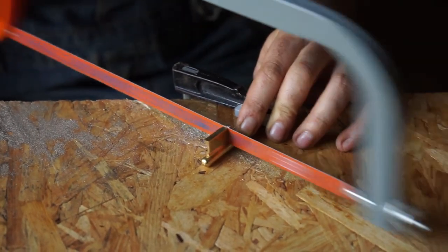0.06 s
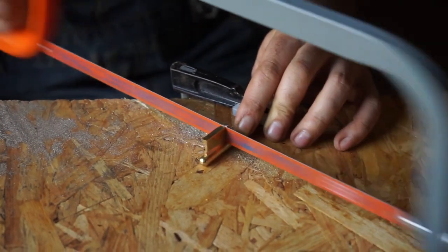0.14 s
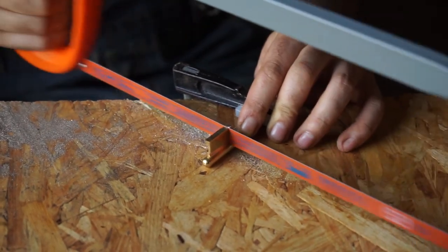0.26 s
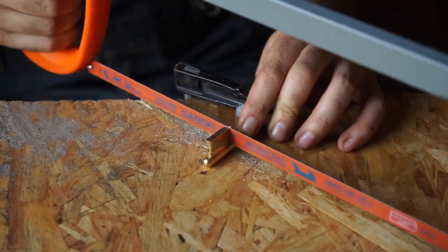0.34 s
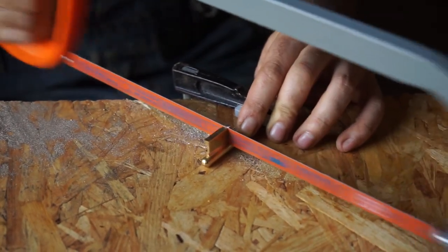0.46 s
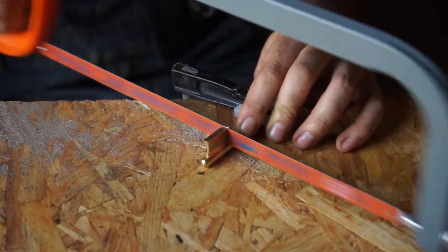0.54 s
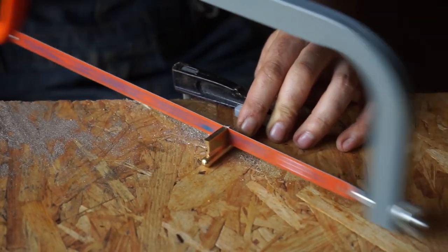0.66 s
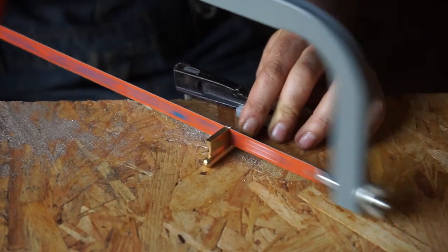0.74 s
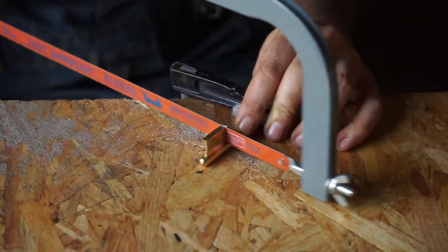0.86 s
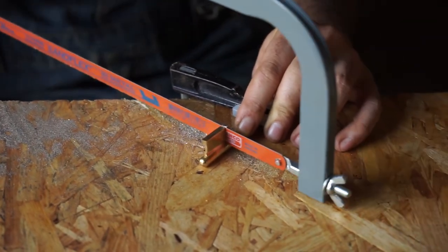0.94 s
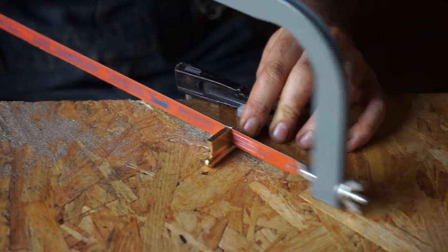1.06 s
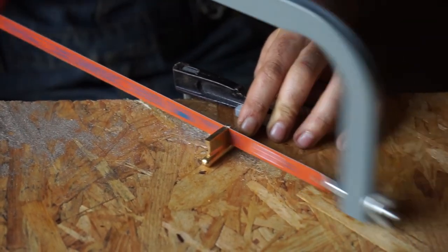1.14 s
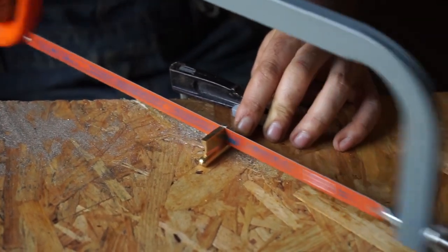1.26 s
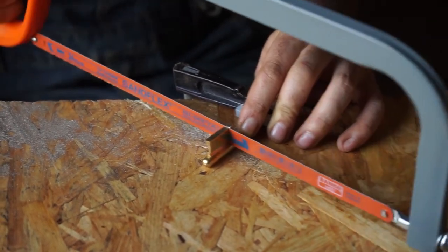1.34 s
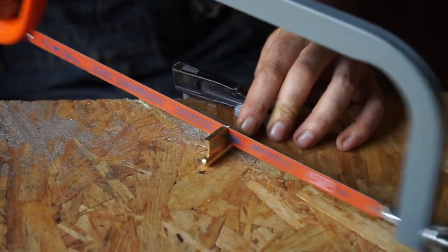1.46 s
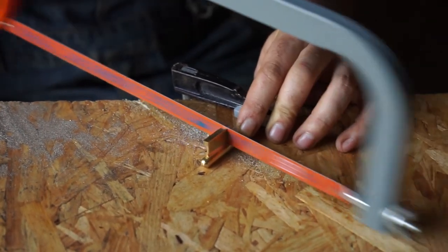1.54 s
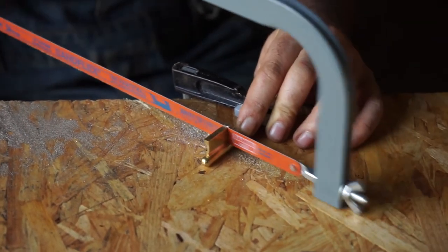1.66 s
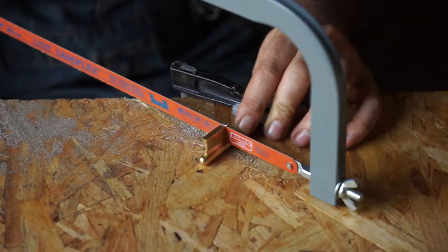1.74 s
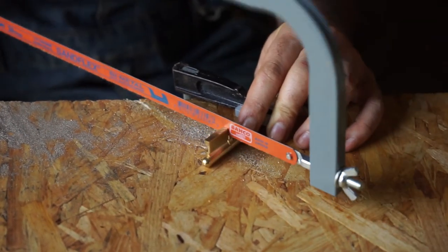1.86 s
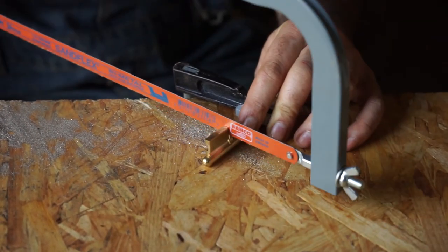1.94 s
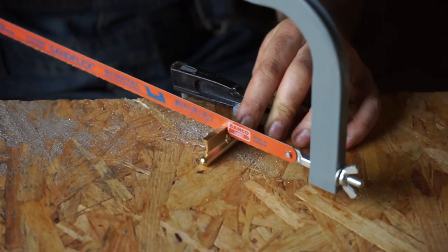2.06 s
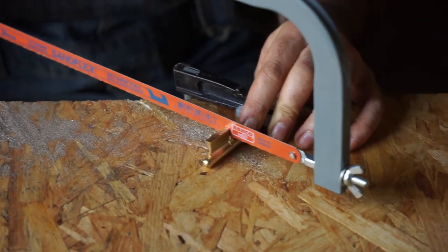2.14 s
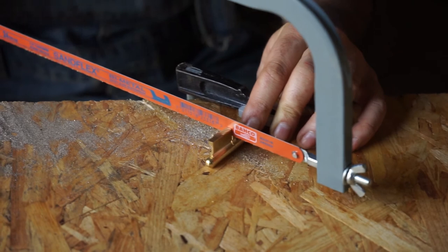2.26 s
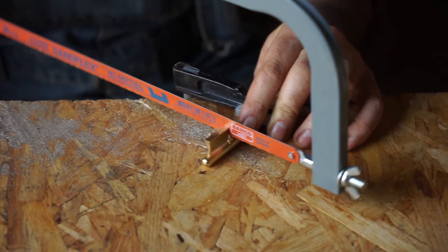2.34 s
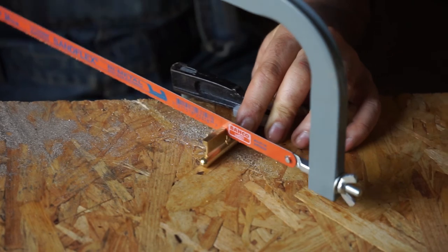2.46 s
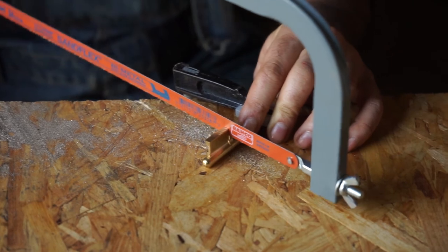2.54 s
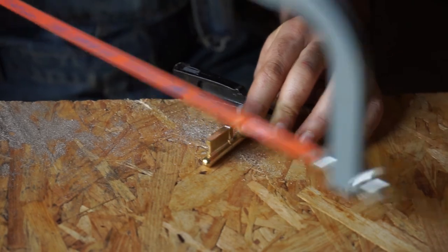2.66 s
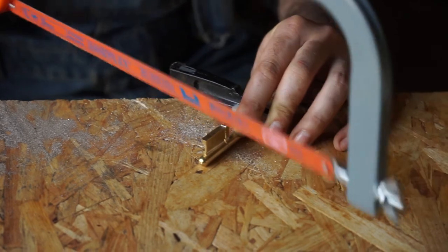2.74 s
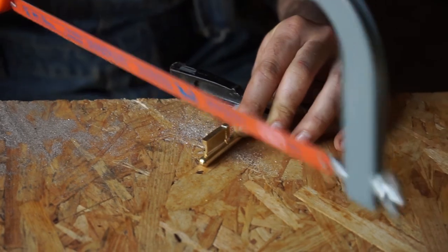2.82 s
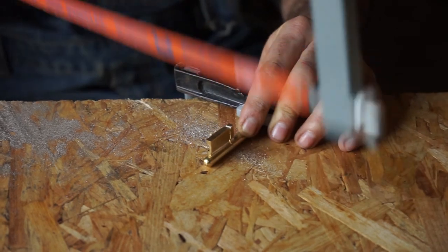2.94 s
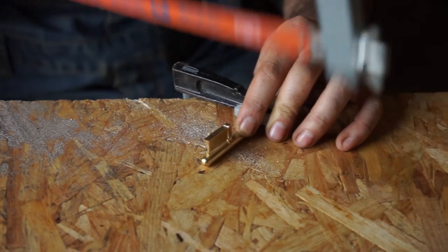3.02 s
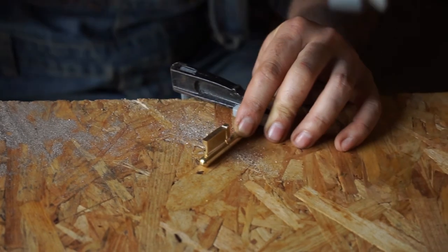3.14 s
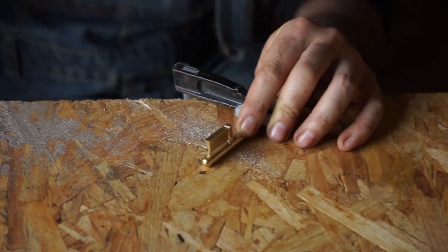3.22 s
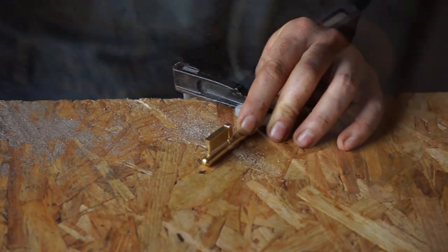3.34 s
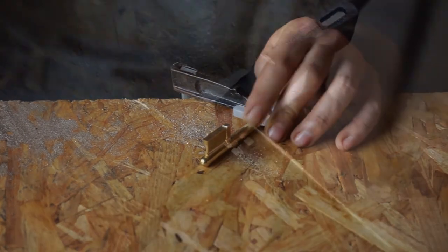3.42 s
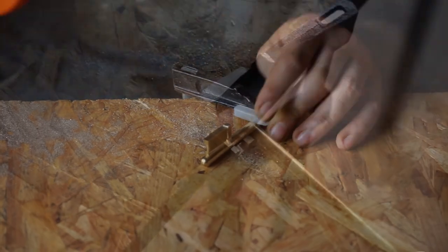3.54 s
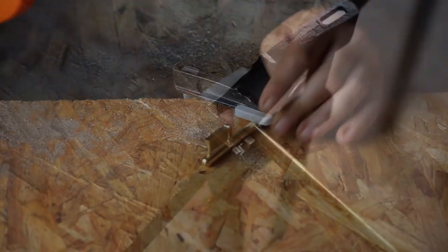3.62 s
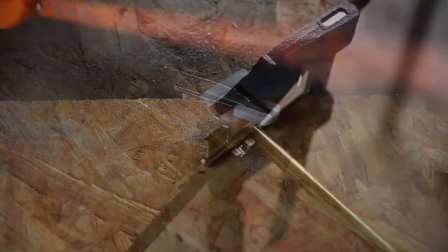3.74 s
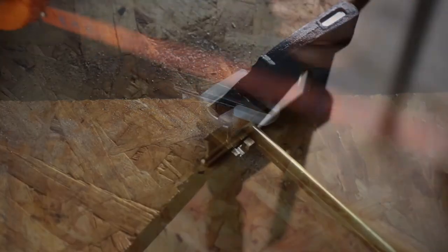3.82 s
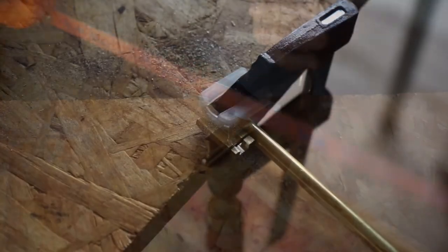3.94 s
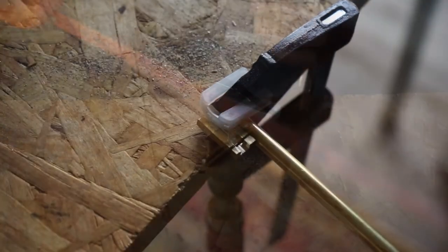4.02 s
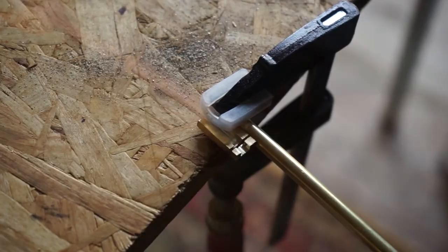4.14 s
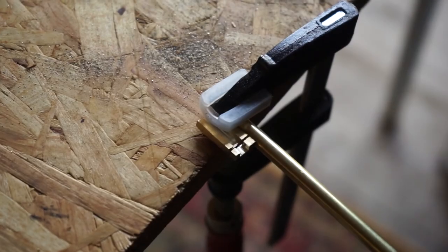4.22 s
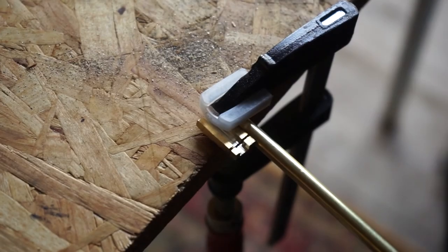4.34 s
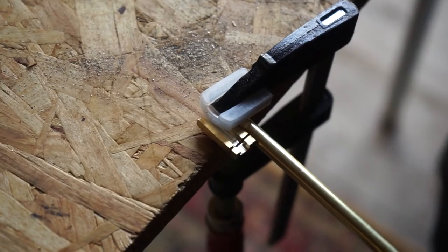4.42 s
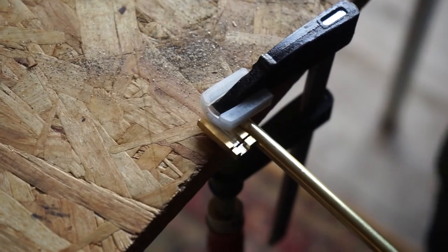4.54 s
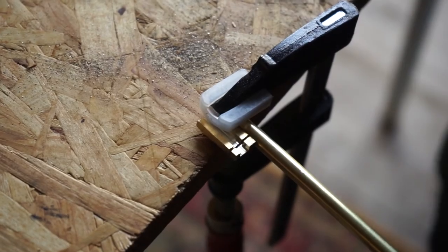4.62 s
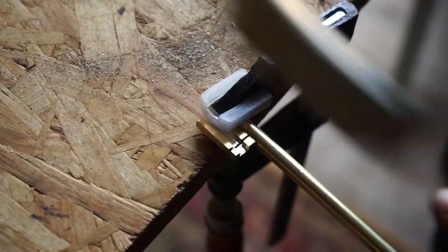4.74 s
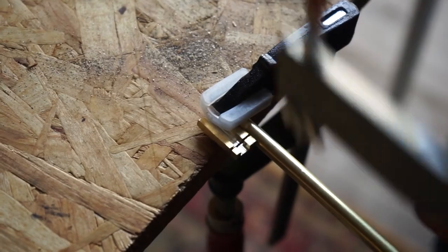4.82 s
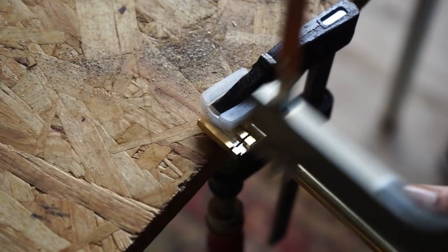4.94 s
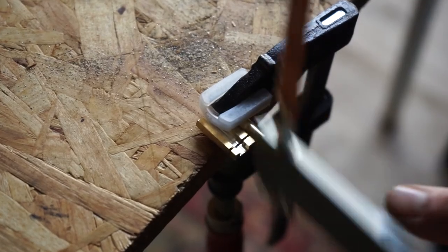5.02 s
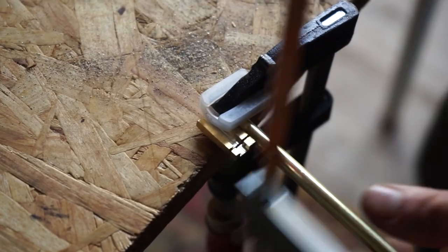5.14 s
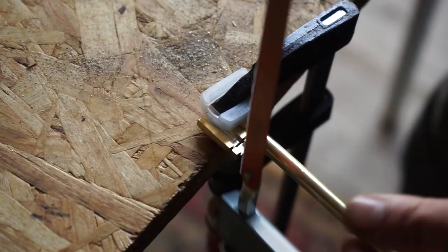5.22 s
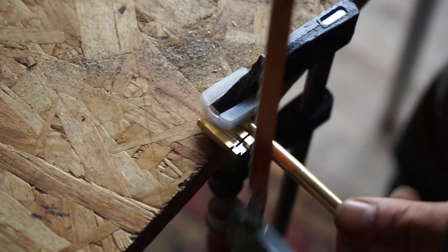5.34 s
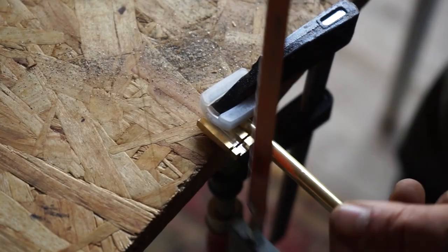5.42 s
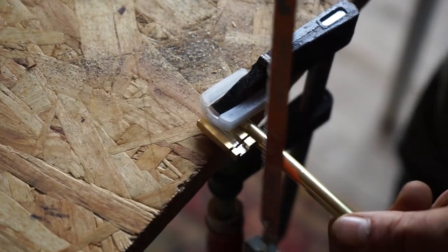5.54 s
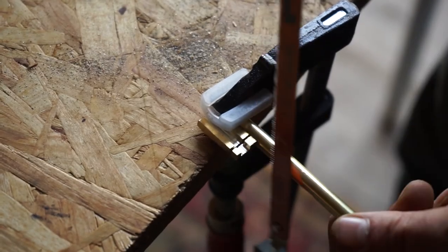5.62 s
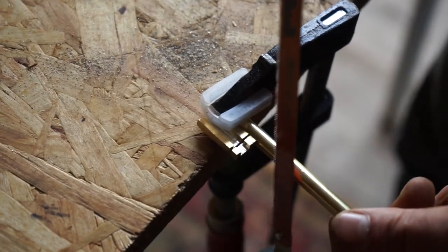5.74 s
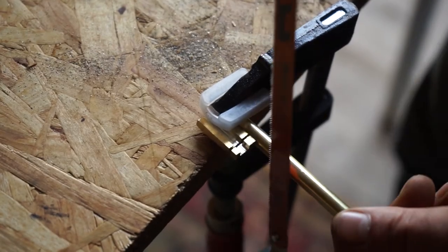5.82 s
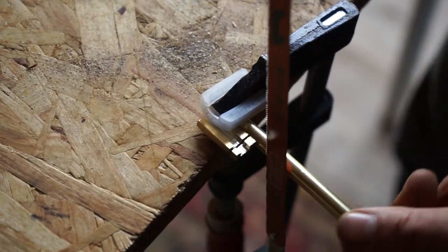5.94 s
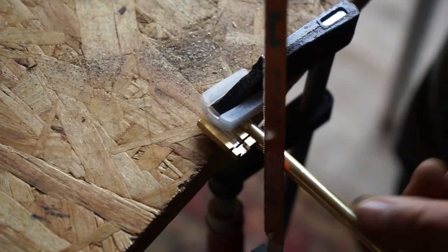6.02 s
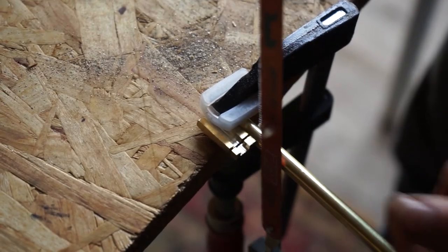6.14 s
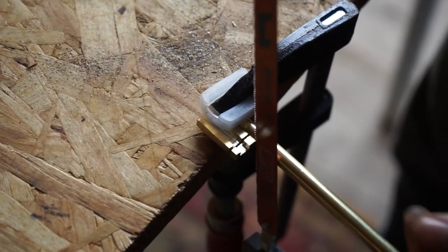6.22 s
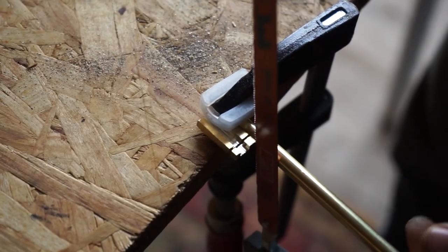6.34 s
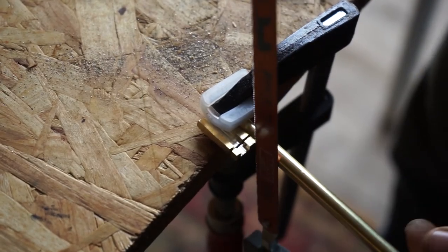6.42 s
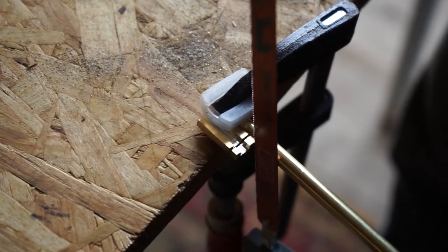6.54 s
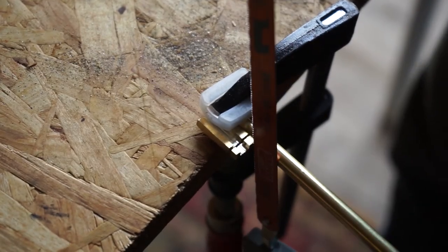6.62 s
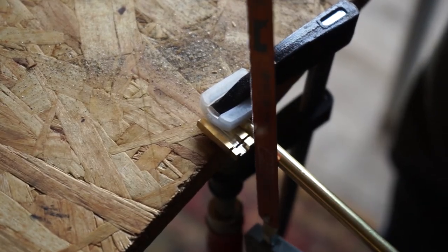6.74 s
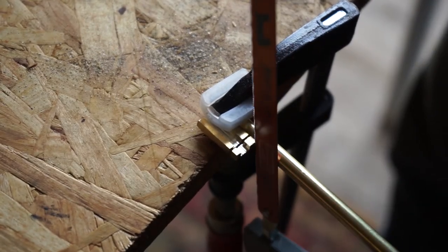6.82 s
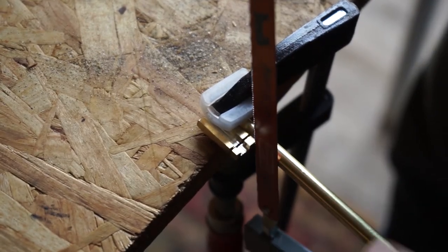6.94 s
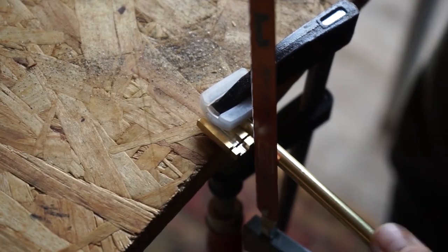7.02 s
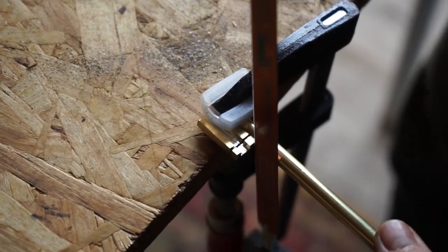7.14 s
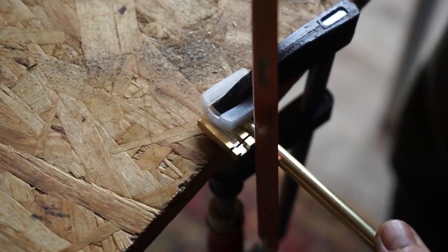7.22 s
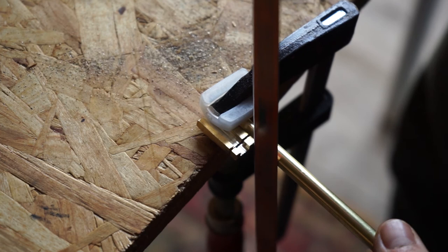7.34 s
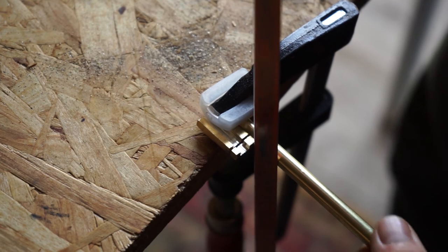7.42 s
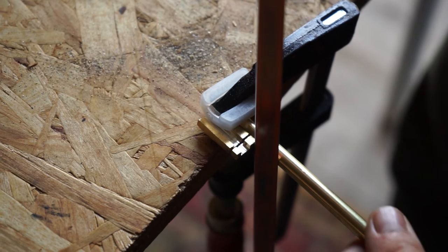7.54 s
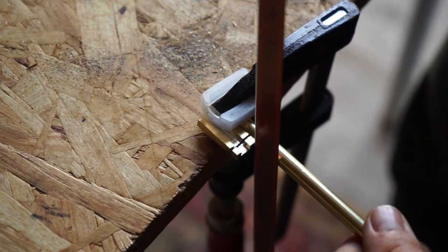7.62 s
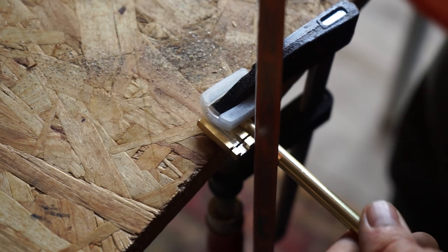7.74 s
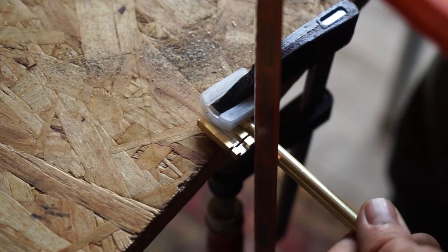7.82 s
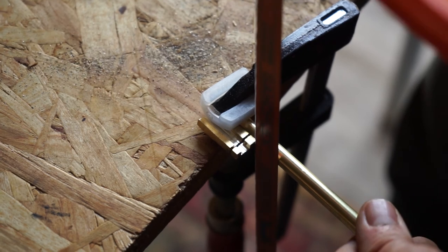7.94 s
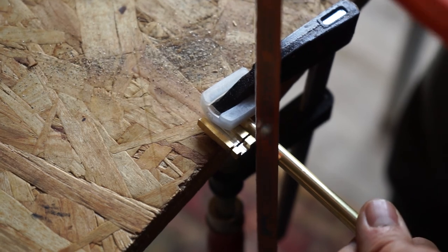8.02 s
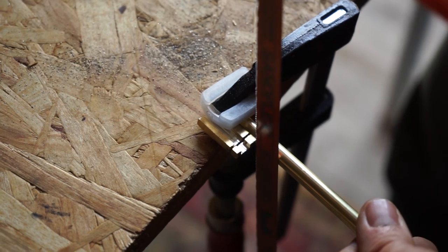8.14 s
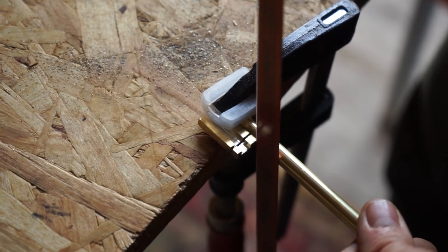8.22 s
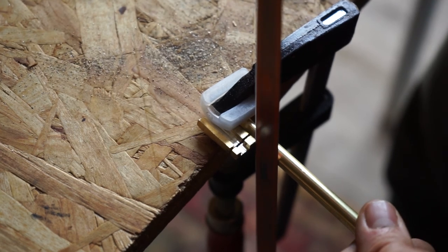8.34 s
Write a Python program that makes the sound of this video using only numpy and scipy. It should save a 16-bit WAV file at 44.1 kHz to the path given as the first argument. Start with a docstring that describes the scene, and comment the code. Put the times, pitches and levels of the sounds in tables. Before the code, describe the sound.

Close stereo pickup in a small workshop. A hacksaw grinds a clamped brass key in gritty pushes whose metallic ring climbs, and shorter scraping pulls, with brief squeaks and snags. It slips out and quiet follows. Steel clanks on the clamp, the bench knocks, then light scrapes lead to one long stuttering push on a brass rod and short pulls, over faint air and hum.

```python
"""A hacksaw is heard first, cutting a brass key clamped to a chipboard bench; it slips out and then cuts a brass rod.
Each stroke swells, holds and eases off: one chipping force grinds the metal, rattles the frame and shakes the bench.
On a push the blade's ring climbs as its free length shortens; on a pull it holds.
Teeth snag, the blade squeaks by stick-slip, tools knock on the bench and steel clanks on the clamp.
Place: a small workshop with faint whistles, air and hum; in stereo, early reflections outweigh direct sound."""
import sys
import numpy as np
from scipy import signal
from scipy.fft import rfft, irfft, next_fast_len
from scipy.io import wavfile
from scipy.ndimage import map_coordinates

SR = 44100
rng = np.random.default_rng(int(sys.argv[2]) if len(sys.argv) > 2 else 0)


def store_wav(level_fs):
    """Save 16-bit WAV to argv[1]."""
    pcm = np.round(np.clip(np.atleast_2d(level_fs), -1, 1) * 32767)
    wavfile.write(sys.argv[1], SR, pcm.T.astype(np.int16))


N = 369116  # length in samples

# Source levels and tones are those before the room; tones are relative where the sound is scaled to rms 1.
# colour of still air: pitch_hz, level_db (relative)
AIR_TONE = [(15, -31), (25, -1.5), (53, 0), (267, -2), (340, -5), (567, -7), (666, -9), (762, -12),
            (945, -10), (2010, -15), (3930, -19.5), (11500, -25.5), (15500, -30)]
# electrical hum: pitch_hz, level_db (before its slow wavering)
HUM = [(48.4, -70), (96.9, -68), (199.2, -70.5)]
# faint gliding whistles: start_s, length_s, start_hz, end_hz, level_db (before flutter)
WHISTLES = [(.99, .07, 4500, 3800, -71), (2.57, .09, 3120, 3050, -68), (2.96, .1, 3800, 3450, -67),
            (3.06, .08, 2820, 2660, -59)]
# likeness of diffuse sound in the two channels: pitch_hz, correlation (0 to 1)
STEREO_LIKENESS = [(100, .998), (200, .98), (350, .85), (700, .5), (2000, .2), (6000, .05), (14000, 0)]
# tilt between the channels: pitch_hz, left_minus_right_db
STEREO_BALANCE = [(250, 0), (600, 1), (1200, -.5), (5000, -.8), (9000, -3.5), (14000, -5)]
# decay of the room's tail: pitch_hz, t60_s
ROOM_DECAY = [(120, 0.8), (500, 0.49), (2000, 0.41), (5000, 0.26), (12000, 0.23)]
# colour of the quick reflections: pitch_hz, level_db (relative)
EARLY_TONE = [(120, -8), (300, -5), (1200, -12), (3000, -5.5), (7000, -6.5), (14000, -0.5)]
# colour of the room's tail before it decays: pitch_hz, level_db (relative)
TAIL_TONE = [(150, -16), (300, -8), (600, -1.5), (2000, 0)]

# blows on the bench: start_s, level_db (before the gains of the parts), hardness_db
KNOCKS = [(.84, -47.5, -24), (.9, -47.5, -28), (1.121, -56.5, 3), (1.516, -43, -4.5), (1.533, -40.5, -8),
          (2.239, -70, 12), (2.668, -68, 4.5), (3.854, -51, 9), (3.885, -48, -3), (4.011, -53, -3.5),
          (5.022, -37.5, 8.5), (5.029, -39, -4), (5.043, -43, -1.5), (6.1, -38, -13.5), (6.123, -46, -4.5),
          (6.292, -50, -12), (6.602, -59.5, -12), (6.767, -55.5, -3.5), (8.08, -44, -20),
          (8.113, -40, -8.5), (8.275, -45, -3)]
# ring of the bench with its clamp: pitch_hz, level_db (relative), t60_s (capped in a knock)
BENCH_MODES = [(127.4, 4.5, .6), (195, -4, 0.46), (227.3, 0.5, .5), (284.6, -16, 0.23), (372, -2.5, 0.36),
               (618, 2, 0.16), (671, -10, 0.25), (837, -6.5, 0.22), (880, -4, 0.17), (969, -1.5, 0.2),
               (1087, -4, .42), (1348, -5.5, 0.22), (1625, -17, 0.22), (1945, -15, 0.2)]
# thud of the board: pitch_hz, level_db (relative)
THUD_TONE = [(35, -27), (70, -9), (90, -10.5), (135, 5.5), (175, 5.5), (240, 1.5), (300, -1.5), (380, -4),
             (480, -5.5), (900, -48)]
# clack of the clamp: pitch_hz, level_db (relative)
CLACK_TONE = [(200, -1.5), (400, -7), (620, 5), (780, -7.5), (950, 4), (1150, 4.5), (1400, -8),
              (2000, -2.5), (2900, -13.5), (3800, -15), (5500, -24), (10000, -30)]
# click of a hard contact: pitch_hz, level_db (relative)
CLICK_TONE = [(900, 9), (1800, 2.5), (2300, -1), (2800, 0), (3800, -3.5), (4600, -8.5), (5600, -5),
              (7500, -18), (10000, -13.5), (15800, -27)]
# steel striking the clamp: start_s, level_db (before the mode levels)
CLANKS = [(3.855, -28), (3.882, -34)]
# ring of that steel: pitch_hz, level_db (relative to the strike), t60_s
CLANK_MODES = [(627, -2, 0.17), (693, -2, 0.17), (2293, -1.5, .22), (3774, -9, 0.11), (4050, -7.5, 0.085),
               (7009, -12, 0.22), (7880, -13, .2)]

# the saw shifting on the bench: start_s, attack_s, hold_s, release_s, scrape_db, rasp_db, bench_db (at full effort)
SHIFTS = [(3.35, .24, .02, .15, -66, -64, -67), (3.87, .03, .19, .13, -46.5, -59, -50),
          (6.125, .04, .21, .07, -47, -64, -47.5), (6.83, .02, .43, .24, -51, -68, -50)]
# scrape of the shifting saw: pitch_hz, level_db (relative)
SHIFT_TONE = [(150, -5), (330, 4.5), (480, 2), (620, 0.5), (900, -10), (1400, -12), (2500, -17),
              (3800, -20), (7000, -52)]
# squeaks of the blade: start_s, length_s, mode, level_db (before a common trim and flutter)
SQUEAKS = [(0.831, .125, "low", -48), (1.478, .06, "low", -43), (1.675, .115, "low", -44.5),
           (1.728, .06, "high", -47), (2.006, .08, "high", -46), (2.395, .06, "high", -58),
           (2.42, .06, "low", -61), (2.7, .115, "low", -44), (2.76, .045, "high", -47)]
# the two modes of the blade that stick-slip locks onto: mode -> pitch_hz (before waver)
SQUEAK_MODES_HZ = {"low": 2277, "high": 2880}
# teeth snagging on an edge: start_s, length_s (before the fall), level_db (before the part gains),
# rasp_db (added to the common rasp and steel gains)
SNAGS = [(0.463, 0.011, -42, -27), (0.53, 0.0051, -36, -14), (0.73, 0.0065, -42, -28),
         (1.124, .005, -44, -11), (1.192, 0.0074, -21.5, -30), (1.286, 0.0094, -21, -25),
         (1.518, 0.0071, -39, -1), (1.55, 0.01, -28, 5), (1.58, .008, -31, 6), (1.613, 0.013, -33.5, 4),
         (2.666, 0.014, -33, -11), (2.686, 0.008, -27.5, 0), (2.809, 0.0062, -36.5, -9),
         (3.858, 0.014, -35.5, 7.5), (3.877, 0.022, -36, 6.5), (4.107, 0.026, -46, 2),
         (4.14, 0.0085, -42.5, -6), (6.005, .004, -48.5, 3), (6.162, 0.0051, -48, 2.5),
         (6.204, .006, -54, 0), (6.22, 0.0052, -47.5, 4.5), (6.355, 0.0046, -48, -7),
         (6.667, 0.022, -37.5, -13), (6.802, 0.01, -35, 1), (6.827, 0.026, -29, 3.5),
         (7.107, 0.0036, -36, -15), (7.142, .003, -36, -17), (7.163, 0.0039, -32.5, -16),
         (7.193, 0.0063, -30, -8), (7.212, 0.0049, -26, -14), (7.236, 0.0056, -26.5, -18),
         (7.28, 0.0081, -23.5, -13.5), (7.321, 0.011, -24.5, -9.5), (7.355, 0.014, -24, -7.5),
         (7.383, 0.0059, -20, -9.5), (7.415, 0.012, -20.5, -11), (7.447, 0.018, -20, -10.5),
         (7.472, 0.0062, -18, -13.5), (7.502, 0.012, -19.5, -17), (7.552, 0.0062, -21, -15.5),
         (7.585, 0.014, -16.5, -15.5), (7.61, 0.021, -19.5, -15), (7.632, 0.014, -21, -16),
         (7.666, 0.0047, -23.5, -21), (7.694, 0.0099, -31, -20), (7.767, .004, -34, -20),
         (7.804, 0.0083, -30, -13), (8.027, 0.0061, -34, -6), (8.22, 0.0075, -36, -12),
         (8.246, 0.0052, -36, -6)]
# resonances of a snag, shifted and reweighted each time: pitch_hz, level_db (relative)
SNAG_TONE = [(300, -26), (600, -2.5), (780, -8), (920, 0.5), (1250, -6), (1700, 5), (1950, 1), (2200, 3.5),
             (2380, -1.5), (2650, 8), (3000, -5.5), (3600, -1), (4100, -12.5), (4600, -9.5), (7000, -39.5)]
# ring of the steel frame and blade in a snag: pitch_hz, level_db (relative, varied), t60_s (capped by the hand)
STEEL_MODES = [(3754, 10.5, 0.14), (4210, 0.5, 0.24), (6140, -6, 1.2), (6400, 2, 0.24), (6830, -3, 0.24),
               (7720, -8, 0.95), (7800, -15, 2.7), (7910, -0.5, 0.59), (8330, -17, 0.14),
               (9160, -7.5, 0.16), (9440, -3, 0.42), (10130, -4.5, 0.35)]

# strokes of the saw, levels at full effort: kind, start_s, attack_s, hold_s, release_s,
# cut_db, rasp_db, bench_db, ring_db, climb_hz (nominal rise of the blade's ring)
STROKES = [ ("key push", 0.0, .14, 0.075, 0.16, -25, -39, -51, -30, 623),
           ("key pull", .4, 0.071, 0.092, 0.071, -34, -41, -45, -34.5, 0),
           ("key pull", .55, 0.054, 0.21, 0.17, -37, -43.5, -48.5, -37, 0),
           ("key push", 1.08, 0.14, 0.06, 0.115, -29, -41, -52, -33.5, 320),
           ("key pull", 1.465, 0.043, 0.023, 0.017, -38, -45, -43, -40, 0),
           ("key pull", 1.547, 0.005, 0.057, 0.12, -31, -35.5, -36.5, -40.5, 0),
           ("key pull", 1.86, 0.028, 0.0045, 0.049, -38.5, -51.5, -51, -59, 0),
           ("key pull", 2.68, 0.0095, 0.0036, 0.08, -42, -38, -69, -41.5, 0),
           ("rod pull", 6.6, .07, .03, .16, -55, -60, -56, -68, 0),
           ("rod pull", 6.785, 0.046, 0.0084, 0.038, -40, -47.5, -45, -48.5, 0),
           ("rod push", 7.05, .555, .09, .19, -38.5, -51, -52, -31.5, 410),
           ("rod pull", 7.96, 0.14, 0.021, 0.057, -36, -53.5, -43, -38, 0),
           ("rod pull", 8.222, 0.012, 0.1, .05, -30.5, -43, -40, -30, 0)]
# colours of the cut, one per metal and direction: pitch_hz, level_db (relative)
KEY_PUSH_TONE = [(300, -24.5), (500, -19), (900, -7), (1250, -12), (1500, 0), (1750, 3.5), (2100, -6),
                 (2750, -10), (3300, -20.5), (4500, -28), (7000, -46.5)]
KEY_PULL_TONE = [(300, -20), (430, -6.5), (510, 1), (650, -2.5), (1200, -2.5), (1420, 1.5), (1620, -3),
                 (1850, -10.5), (2500, -11), (3500, -19), (4500, -21), (7000, -37)]
ROD_PUSH_TONE = [(300, -19), (550, -5), (1000, 5), (1300, 7), (1700, 7.5), (2100, -0.5), (2650, 1),
                 (3050, -6), (3650, -5), (4500, -5), (7000, -36)]
ROD_PULL_TONE = [(30, 4), (65, 3), (130, 0), (220, -1), (300, -10), (410, 12.5), (520, 1.5), (740, -14),
                 (880, -3), (1020, -6), (1200, 2), (1550, -10), (1850, -7), (2600, -9.5), (4200, -17.5),
                 (7000, -37.5)]
# hiss of the teeth, on the key and in snags, then on the rod and in shifts: pitch_hz, level_db (relative)
KEY_RASP = [(2500, -33), (4500, -0.5), (5600, 2), (6650, 2), (7300, -2.5), (8070, 1.5), (9000, -5),
            (10500, -3.5), (11700, -3.5), (12800, -9), (15800, -17)]
ROD_RASP = [(2500, -28), (4200, 3), (5600, 0.5), (6650, -1.5), (7600, 0), (9000, -4), (10300, -8.5),
            (12000, -11.5), (15800, -20)]
# shaking of the bench under the saw: pitch_hz, level_db (relative)
BENCH_THRUM = [(30, -18), (55, -11), (90, -12), (130, 3.5), (190, -2), (260, -2.5), (390, -6.5),
               (520, -5.5), (900, -59.5)]
# ring of the saw frame in a stroke: pitch_hz, level_db (relative)
FRAME_MODES = [(1567, -36), (1707, -49), (1750, -58), (1814, -32), (1965, -43), (2008, -49), (2299, -51),
               (2627, -69), (2751, -63)]
# rise from a turning point to full effort: path -> rise_db
SWINGS_DB = {"cut": 18, "rasp": 22, "bench": 7, "ring": 17}

AIR_DB = -58  # typical rms level; it drifts slowly
TOP_HZ = 15850  # band limit of the recorder
RING_PER_HARDNESS, CLICK_PER_HARDNESS = 0.89, 1  # dB gained per dB of hardness; the clack gains it in full
CLANK_JITTER_S = 3e-5  # timing spread of the loose contact
SNAG_DETUNE, SNAG_VARY_DB = .025, 2.5  # spread of the shift (ratio) and of the weights (dB)
FRAME_T60 = 0.17  # s
PRESSURE_DB, PRESSURE_RATE = 1.5, 22  # uneven pressure of the hand: spread (dB), knots a second
GLIDE_MIDDLE = 0.428  # share of a stroke at which the blade's ring climbs fastest
UPPER_MODE_RATIO = 2.64  # the blade's second bending mode over its first
RING_DB_PER_OCTAVE = 6  # the blade rings louder as it shortens


def amp(db):
    """Decibels to gain."""
    return 10 ** (np.asarray(db) / 20)


def unit(x):
    """Scale to rms 1."""
    return x / np.sqrt(np.mean(x ** 2) + 1e-20)


def along(points, hz):
    """Read (pitch_hz, value) points on a log-frequency axis."""
    f, v = np.transpose(points)
    return np.interp(np.log(hz + 1), np.log(f + 1), v)


def add(track, s, x):
    """Mix x into the track from time s (seconds)."""
    start = max(round(s * SR), 0)
    part = track[..., start:start + x.shape[-1]]
    part += x[..., :part.shape[-1]]


def wobble(rate, n):
    """A smooth random curve, rate knots a second."""
    knots = rng.standard_normal(int(n * rate / SR) + 4)
    return map_coordinates(knots, [np.arange(n) * rate / SR])


def filtered(x, response):
    """x times a response of frequency."""
    n = x.shape[-1]
    m = next_fast_len(n + 8192)
    hz = np.fft.rfftfreq(m, 1 / SR)
    return irfft(rfft(x, m) * response(hz), m)[..., :n]


def coloured(x, spectrum, size=2048):
    """Causal, minimum-phase filter with the given spectrum: it rings only after each pulse."""
    hz = np.fft.rfftfreq(size, 1 / SR)
    cepstrum = irfft(np.log(amp(along(spectrum, hz))))
    # folding the cepstrum forward in time makes the filter causal
    cepstrum[1:size // 2] *= 2
    cepstrum[size // 2 + 1:] = 0
    impulse = irfft(np.exp(rfft(cepstrum)))
    return signal.fftconvolve(x, impulse)[:len(x)]


def diffuse(n):
    """Stereo noise, alike in the bass and unrelated in the treble."""
    def mid_side_gains(hz):
        """Split the energy between mid and side to give the likeness."""
        turn = np.arccos(np.clip(along(STEREO_LIKENESS, hz), -1, 1)) / 2
        return np.array([np.cos(turn), np.sin(turn)])

    mid, side = filtered(rng.standard_normal((2, n)), mid_side_gains)
    return np.array([mid + side, mid - side])


def room_tone(hum_db):
    """Still air and a faint, unsteady electrical hum."""
    t = np.arange(N) / SR
    air = unit(filtered(diffuse(N), lambda hz: amp(along(AIR_TONE, hz))))
    air = air * amp(.5 * wobble(3, N))
    hum = np.zeros(N)
    for hz, db in HUM:
        level = amp(db + 2.5 * wobble(4, N))
        hum += level * unit(np.sin(2 * np.pi * (hz * t + rng.random())))
    return amp(AIR_DB) * air + amp(hum_db) * hum


def whistles(waver, flutter_db):
    """Faint, thin tones that glide and waver in the background."""
    out = np.zeros(N)
    for s, length, start_hz, end_hz, db in WHISTLES:
        n = round(length * SR)
        hz = np.geomspace(start_hz, end_hz, n) * (1 + waver * wobble(82, n))
        swell = amp(db + flutter_db * wobble(29, n)) * signal.windows.tukey(n, .5)
        tone = np.sin(2 * np.pi * np.cumsum(hz) / SR)
        add(out, s, swell * unit(tone))
    return out


def echo(early_db, early_t60, tail_db):
    """Quick bright reflections from the bench top, and a tail of the room that decays faster in the treble."""
    n = SR // 2

    def reflections(colour):
        return filtered(diffuse(n), lambda hz: amp(along(colour, hz)))

    hz, t, bins = signal.stft(reflections(TAIL_TONE), SR, nperseg=256)
    decay = amp(-60 * t / along(ROOM_DECAY, hz)[:, None])
    tail = signal.istft(bins * decay, SR, nperseg=256)[1][:, :n]
    tail = np.pad(tail, ((0, 0), (SR // 128, 0)))[:, :n]  # arrives about 8 ms later
    early = reflections(EARLY_TONE) * amp(-60 * np.arange(n) / SR / early_t60)
    return (amp(tail_db) * unit(tail) + amp(early_db) * unit(early)) / np.sqrt(n)


def workshop(x, direct_db, early_db, early_t60, tail_db):
    """Direct sound plus reflections, whose random pattern is renewed in overlapping windows."""
    hop = SR // 2
    direct = amp(direct_db) * np.array([x, x])
    padded = np.pad(x, (hop, 2 * hop))
    wet = np.zeros((2, len(padded)))
    window = np.sin(np.pi * np.arange(2 * hop) / (2 * hop))
    # each window lasts one second and overlaps the next by half
    for i in range(0, N + hop, hop):
        piece = (padded[i:i + 2 * hop] * window)[None]
        add(wet, i / SR, signal.fftconvolve(piece, echo(early_db, early_t60, tail_db), axes=1))
    heard = direct + wet[:, hop:hop + N]
    sides = np.array([[.5], [-.5]])
    return filtered(heard, lambda hz: amp(sides * along(STEREO_BALANCE, hz)))


def knocks(thud_db, ring_db, clack_db, click_db, thud_t60, clack_t60, click_t60):
    """The board thuds and rings on; the harder the contact, the more it clicks and the clamp clacks."""
    out, t = np.zeros(N), np.arange(SR * 3 // 4) / SR
    contact = 1 - np.exp(-t / 0.00067)  # the force takes a moment to build

    def puff(t60, colour):
        """A decaying burst of coloured noise."""
        burst = contact * amp(-60 * t / t60) * rng.standard_normal(len(t))
        return unit(coloured(burst, colour))

    for s, strength, hardness in KNOCKS:
        modes = np.zeros(len(t))
        for k, (hz, db, t60) in enumerate(BENCH_MODES):
            decay = amp(db + rng.normal(0, 1) - 60 * t / min(t60, .42))
            modes += decay * np.sin(2 * np.pi * hz * t) * (-1) ** k
        board = amp(thud_db) * puff(thud_t60, THUD_TONE)
        board += amp(ring_db + RING_PER_HARDNESS * hardness) * unit(modes)
        clamp = amp(clack_db + hardness) * puff(clack_t60, CLACK_TONE)
        clamp += amp(click_db + CLICK_PER_HARDNESS * hardness) * puff(click_t60, CLICK_TONE)
        add(out, s, amp(strength) * (board + clamp))
    return out


def clanks():
    """Steel strikes steel at the clamp and rings on; the loose contact roughens the ring."""
    out, t = np.zeros(N), np.arange(SR // 2) / SR
    for s, strength in CLANKS:
        rattled = t + CLANK_JITTER_S * wobble(300, len(t))
        ring = np.zeros(len(t))
        for hz, db, t60 in CLANK_MODES:
            decay = amp(strength + db - 60 * t / t60)
            ring += decay * np.sin(2 * np.pi * (hz * rattled + rng.random()))
        add(out, s, ring)
    return out


def chips(n, rate, scatter_db, rub, chatter_db):
    """Cutting force: tiny fractures of uneven size over steady rubbing, in clumps as the blade chatters."""
    breaks = (rng.random(n) < rate / SR) * amp(scatter_db * rng.standard_normal(n))
    breaks = breaks * rng.choice([-1, 1], n)
    force = unit(breaks) + rub * rng.standard_normal(n)
    return unit(force * amp(chatter_db * wobble(111.85, n)))


def slackness(attack, hold, release, ease):
    """Per sample: 1 at the turning points, 0 at full effort; a higher ease rounds the shoulders."""
    t = np.arange(round((attack + hold + release) * SR)) / SR
    slack = np.maximum(1 - t / attack, (t - attack - hold) / release)
    return np.clip(slack, 0, 1) ** ease


def scrape(force, slack, tone, hiss, cut_db, rasp_db, bench_db):
    """One force grinds in the metal, hisses at the teeth and shakes the bench; all three follow the effort."""
    paths = ("cut", cut_db, tone), ("rasp", rasp_db, hiss), ("bench", bench_db, BENCH_THRUM)
    sound = np.zeros(len(force))
    for path, db, colour in paths:
        sound += amp(db - SWINGS_DB[path] * slack) * unit(coloured(force, colour))
    return sound


def faded(x):
    """Soften both ends of a move."""
    return x * signal.windows.tukey(len(x), .14)


def shifts(rate, chatter_db, ease):
    """The saw slides lightly over the clamp and the board, without cutting."""
    out = np.zeros(N)
    for s, attack, hold, release, *levels in SHIFTS:
        slack = slackness(attack, hold, release, ease)
        force = chips(len(slack), rate, scatter_db=2.5, rub=0.73, chatter_db=chatter_db)
        add(out, s, faded(scrape(force, slack, SHIFT_TONE, ROD_RASP, *levels)))
    return out


def squeaks(level_db, octave_db, waver, flutter_db):
    """Stick-slip locks onto one mode of the blade and gives a nearly pure, fluttering tone."""
    out = np.zeros(N)
    for s, length, mode, db in SQUEAKS:
        n = round(length * SR)
        hz = SQUEAK_MODES_HZ[mode] * (1 + waver * wobble(225, n))
        phase = 2 * np.pi * np.cumsum(hz) / SR
        swell = amp(db + level_db + flutter_db * wobble(116, n)) * signal.windows.tukey(n, .6)
        add(out, s, swell * unit(np.sin(phase) + amp(octave_db) * np.sin(2 * phase)))
    return out


def snags(rise, fall, chatter_db, bite_db, rasp_db, steel_db, held_t60):
    """A tooth catches and judders through ragged chips that ring the steel; the hand damps the ring."""
    out, t = np.zeros(N), np.arange(SR // 8) / SR
    for s, length, db, rasp in SNAGS:
        burst = (1 - np.exp(-t / rise)) * np.exp(-np.maximum(t - length, 0) / fall)
        force = burst * chips(len(t), rate=1300, scatter_db=3, rub=0.41, chatter_db=chatter_db)
        steel = np.zeros(len(t))
        for hz, level, t60 in STEEL_MODES:
            decay = amp(level + rng.normal(0, 2.0) - 60 * t / min(t60, held_t60))
            steel += decay * np.sin(2 * np.pi * hz * t)
        ring = unit(signal.fftconvolve(force, steel)[:len(t)])
        bright = amp(rasp_db) * unit(coloured(force, KEY_RASP)) + amp(steel_db) * ring
        shift = 1 + SNAG_DETUNE * rng.standard_normal()
        tone = [(hz * shift, level + SNAG_VARY_DB * rng.standard_normal()) for hz, level in SNAG_TONE]
        bite = amp(bite_db) * unit(coloured(force, tone))
        add(out, s, amp(db) * (bite + amp(rasp) * bright))
    return out


def blade(n, start_hz, climb_hz, glide_share, width_hz, upper_db):
    """The teeth keep exciting two damped bending modes, whose pitches follow the travel of the saw."""
    travel = (1 + np.tanh((np.linspace(0, 1, n) - GLIDE_MIDDLE) / glide_share)) / 2
    hz = start_hz + climb_hz * travel
    force = chips(n, rate=900, scatter_db=7.5, rub=1.0, chatter_db=3.0)

    def mode(ratio):
        """One resonance at a multiple of the pitch; higher ones are broader."""
        turn = np.exp(2j * np.pi * np.cumsum(ratio * hz) / SR)
        lowpass = signal.butter(2, ratio * width_hz / 2, fs=SR, output="sos")
        # shift the moving pitch down to zero, filter there, and shift back
        return unit((signal.sosfilt(lowpass, force / turn) * turn).real)

    loudness = amp(RING_DB_PER_OCTAVE * np.log2(hz / hz[-1]))
    return loudness * (mode(1) + amp(upper_db) * mode(UPPER_MODE_RATIO))


def strokes(kind, tone, hiss, rate, chatter_db, ease, frame_db, ring_hz, width_hz, upper_db, glide_share=.25):
    """The teeth scrape through the cut; the frame and the blade ring along."""
    out, t = np.zeros(N), np.arange(SR // 4) / SR
    frame = sum(amp(db - 60 * t / FRAME_T60) * np.sin(2 * np.pi * hz * t) for hz, db in FRAME_MODES)
    for row_kind, s, attack, hold, release, cut, rasp, bench, ring, climb_hz in STROKES:
        if row_kind != kind:
            continue
        slack = slackness(attack, hold, release, ease)
        n = len(slack)
        force = chips(n, rate, scatter_db=2.5, rub=0.88, chatter_db=chatter_db)
        force = force * amp(PRESSURE_DB * wobble(PRESSURE_RATE, n))
        sound = scrape(force, slack, tone, hiss, cut, rasp, bench)
        frame_ring = unit(signal.fftconvolve(force, frame)[:n])
        sound += amp(cut + frame_db - SWINGS_DB["cut"] * slack) * frame_ring
        blade_ring = blade(n, ring_hz, climb_hz, glide_share, width_hz, upper_db)
        sound += amp(ring - SWINGS_DB["ring"] * slack) * blade_ring
        add(out, s, faded(sound))
    return out


def scene():
    """Saw, bench and room together."""
    dry = strokes("key push", KEY_PUSH_TONE, KEY_RASP, rate=700, chatter_db=1.5, ease=1.25,
                  frame_db=-13.5, ring_hz=516, width_hz=139, upper_db=-7.5, glide_share=0.26)
    dry += strokes("key pull", KEY_PULL_TONE, KEY_RASP, rate=1100, chatter_db=0.5, ease=1.17,
                   frame_db=-14.0, ring_hz=1522, width_hz=180, upper_db=-30)
    dry += strokes("rod push", ROD_PUSH_TONE, ROD_RASP, rate=910, chatter_db=1.0, ease=0.75,
                   frame_db=-11, ring_hz=535, width_hz=115, upper_db=-12, glide_share=0.14)
    dry += strokes("rod pull", ROD_PULL_TONE, ROD_RASP, rate=1900, chatter_db=3.5, ease=2.33,
                   frame_db=-20, ring_hz=901, width_hz=164, upper_db=-24)
    dry += shifts(rate=900, chatter_db=2.5, ease=0.97)
    dry += squeaks(level_db=0.5, octave_db=-19, waver=0.0019, flutter_db=3.0)
    dry += whistles(waver=0.0096, flutter_db=4.0)
    dry += snags(rise=0.0011, fall=0.0024, chatter_db=0.5, bite_db=-19.0,
                 rasp_db=-20, steel_db=-22, held_t60=0.02)
    dry += knocks(thud_db=-5.5, ring_db=-5, clack_db=-9, click_db=-9,
                  thud_t60=0.25, clack_t60=0.11, click_t60=0.026)
    dry += clanks()
    heard = workshop(dry, direct_db=-4.5, early_db=0.0, early_t60=0.045, tail_db=-8.5)
    return heard + room_tone(hum_db=0.0)


def record(dry):
    """The recorder keeps nothing above its band limit."""
    return filtered(dry, lambda hz: hz < TOP_HZ)


dry = scene()
out = record(dry)
store_wav(out)
```